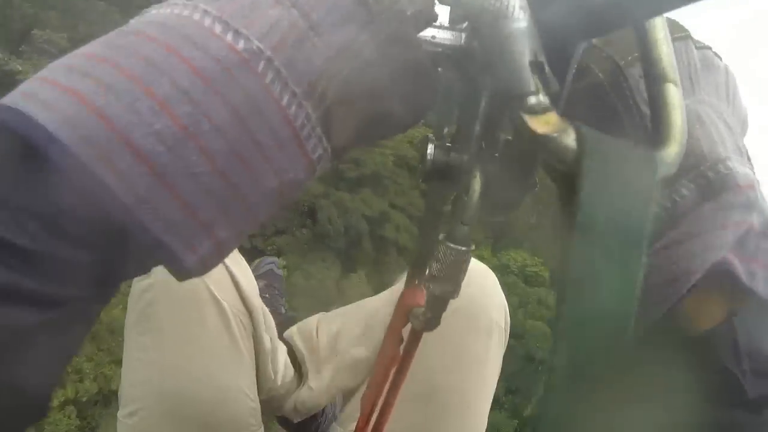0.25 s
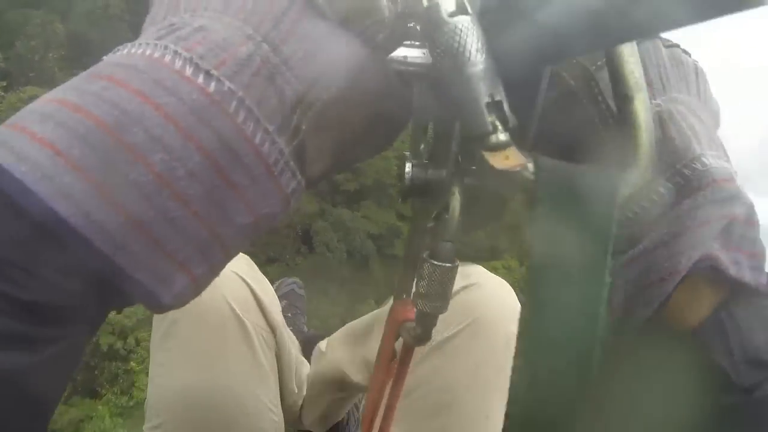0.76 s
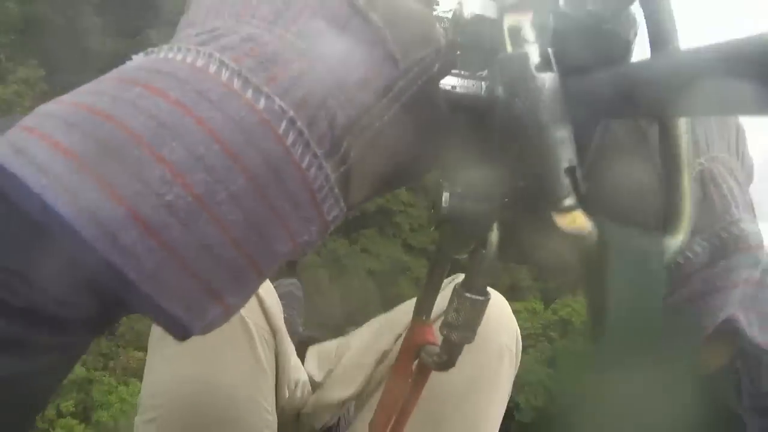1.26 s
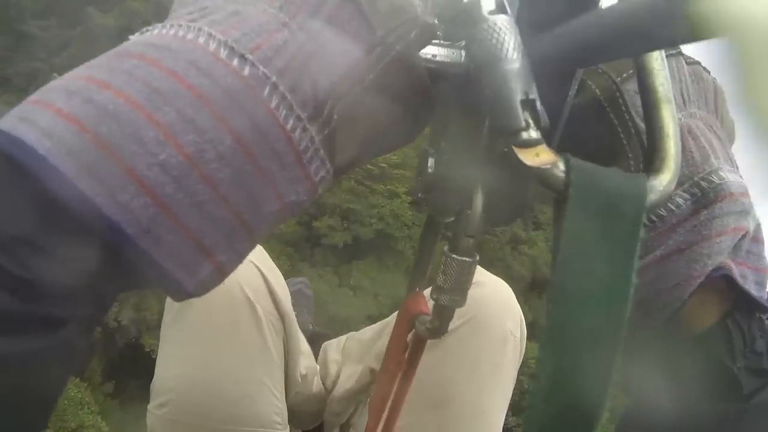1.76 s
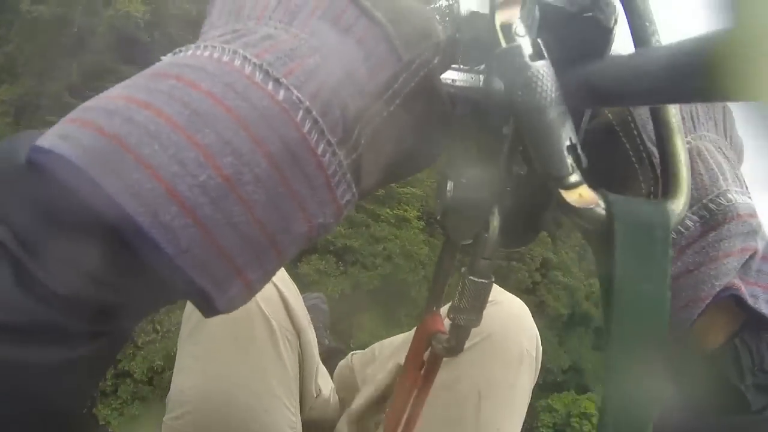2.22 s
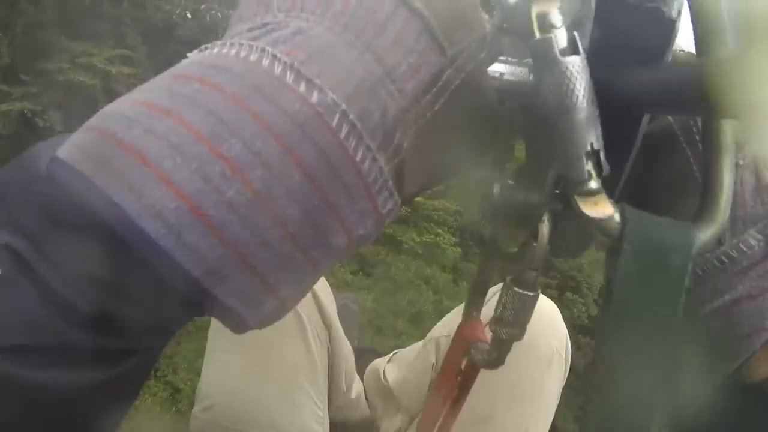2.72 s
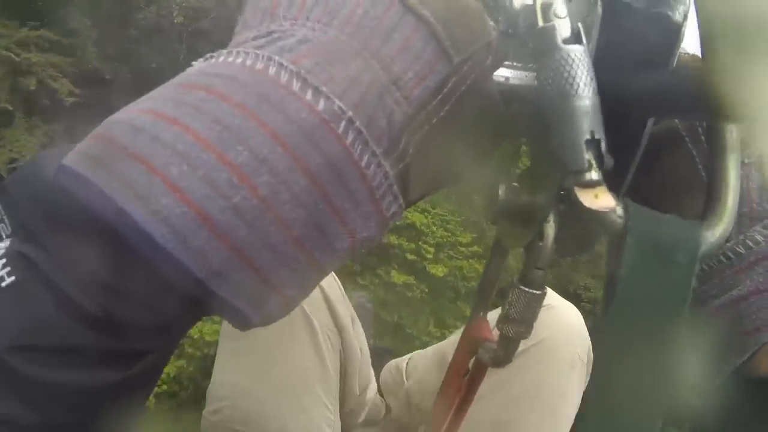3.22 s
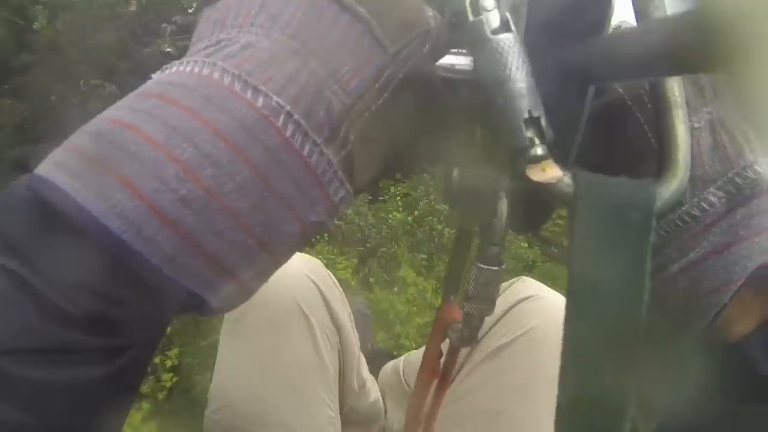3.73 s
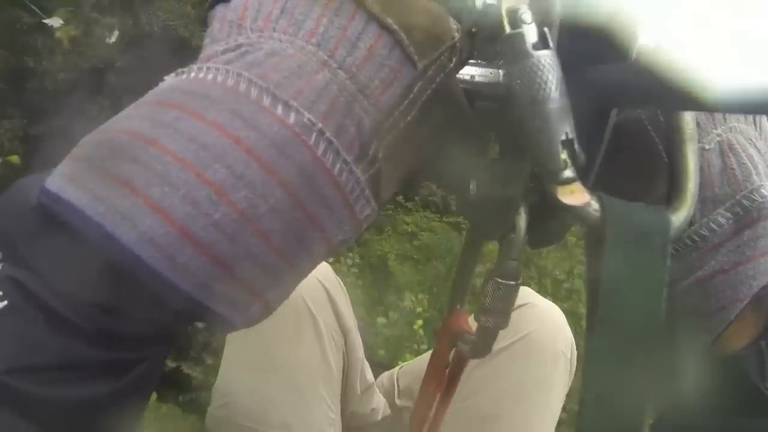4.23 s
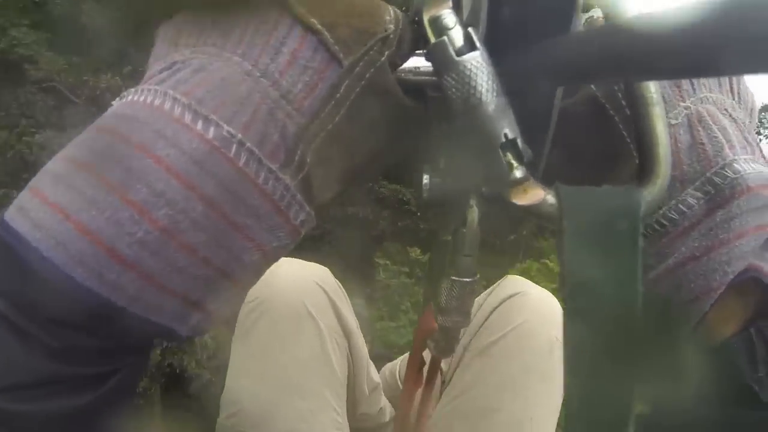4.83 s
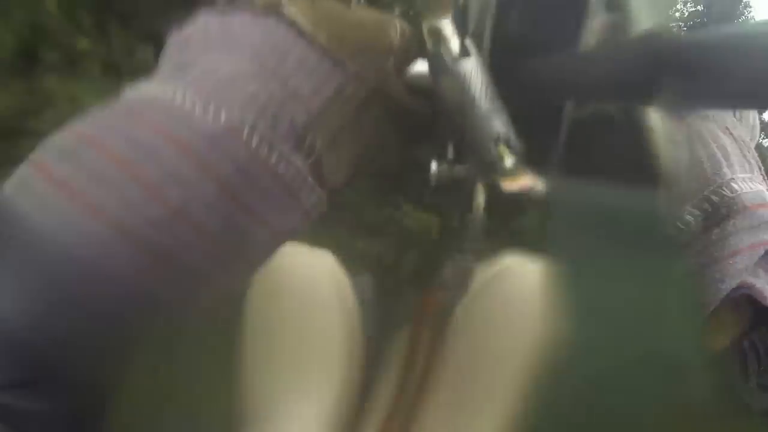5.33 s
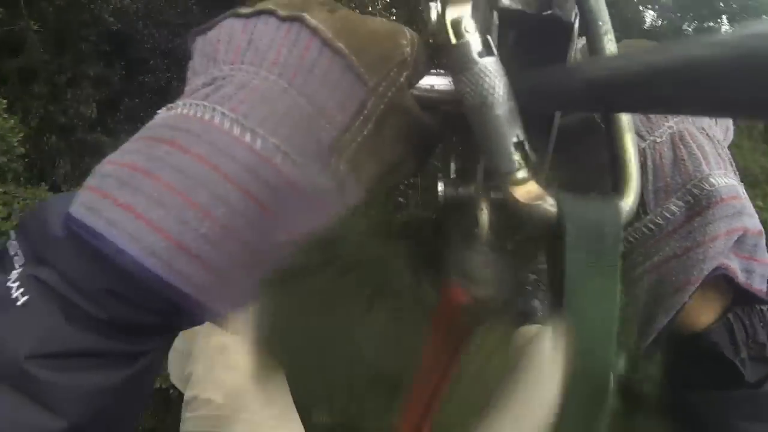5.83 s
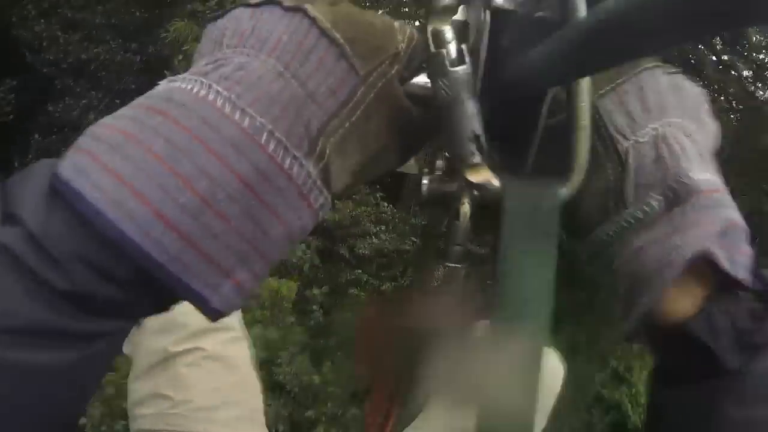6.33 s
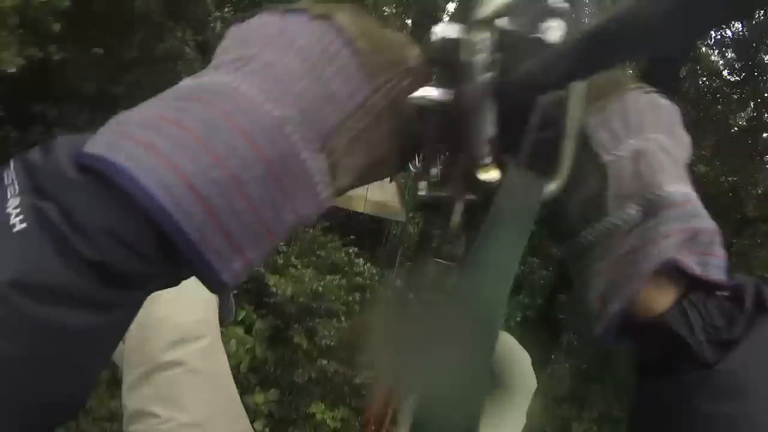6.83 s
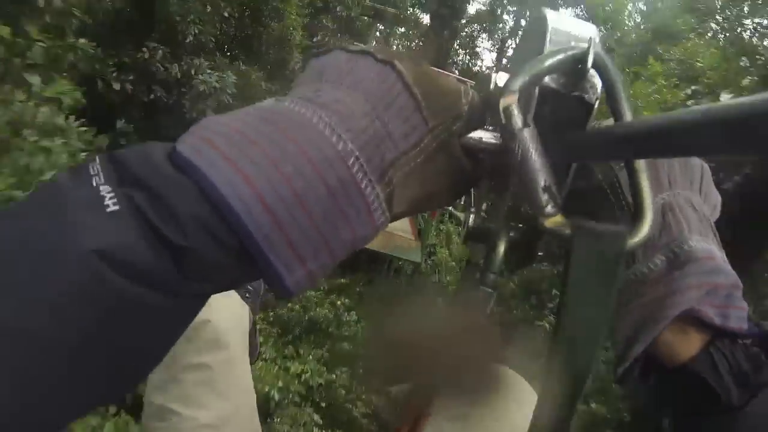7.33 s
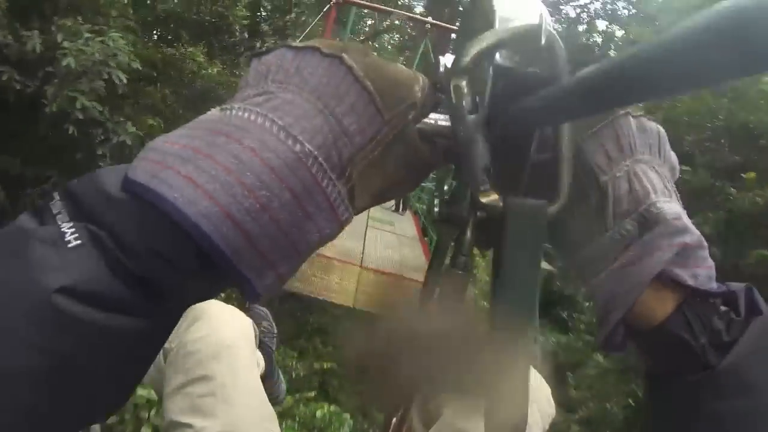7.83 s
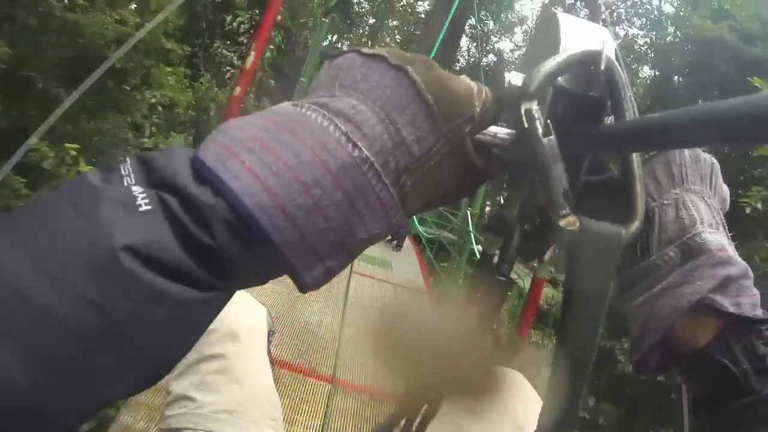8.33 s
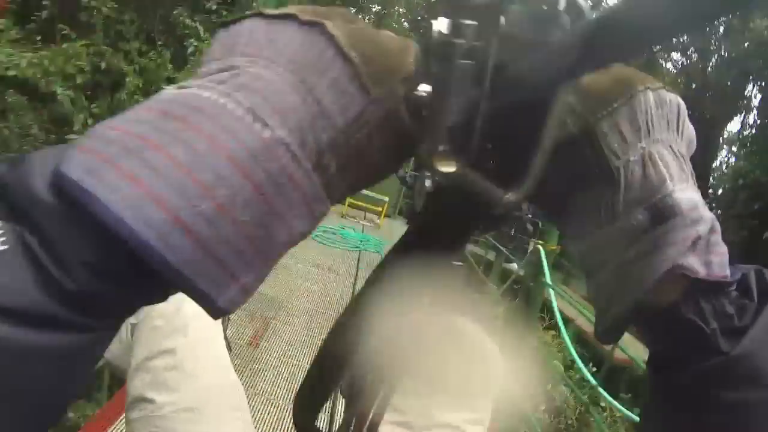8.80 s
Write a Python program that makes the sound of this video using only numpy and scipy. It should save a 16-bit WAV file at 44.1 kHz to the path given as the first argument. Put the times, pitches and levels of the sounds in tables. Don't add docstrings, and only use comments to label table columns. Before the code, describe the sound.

A zip line trolley is already running fast on a steel cable outdoors, heard close through a sealed case worn by the rider. Wheels and bearings give a high, gritty metallic whine that swells and wavers, over muffled wind buffeting and hollow low boom. At about 0.9 s a twig raps the case in a quick hard cluster; the ride dips, then recovers. The whine continues, gradually falling in pitch, with small jolts. At 5.7 s another twig clatters, and from 6.4 to 6.7 s a branch scrapes roughly with loud cracks, leaving the ride much quieter before it creeps back. A sharp tick comes near 6.8 s. From 7 s the slowing wheels tick rapidly, with a strand hum around 7.5 to 8 s and bright surges. A deep thump lands near 8.7 s; the rumble thins, wind buffeting rises, and light taps close at 9 s.

```python
import sys
import numpy as np
from scipy import signal
from scipy.fft import rfft, irfft
from scipy.io import wavfile
from scipy.ndimage import uniform_filter1d

SR = 44100
rng = np.random.default_rng(int(sys.argv[2]) if len(sys.argv) > 2 else 0)


def dump_mix(stems):
    frames = np.atleast_2d(stems).T
    limited = np.clip(frames, -1, 1)
    pcm = np.round(limited * 32767).astype(np.int16)
    wavfile.write(sys.argv[1], SR, pcm)


def natural_amplitude(level_db):
    exponent = np.asarray(level_db, float) / 20
    return 10 ** exponent


N = 399546
T = np.arange(N) / SR

# time in seconds, force in dB, share taken by wheels and bearings in dB.
ROLL = [(0, -26, -2), (.35, -31, 3.5), (.85, -27.5, 3.5), (1.5, -27, 1.5), (2.2, -29.5, 4.5),
        (2.8, -26, 1.5), (3.4, -26, -1), (4.3, -25, 2), (5.2, -27, 2.5), (5.65, -25.5, 0.5),
        (6.22, -27, -0.5), (6.38, -21.5, 0), (7.3, -29, 2), (7.52, -24, 5), (8.0, -26, 4), (8.2, -32, 1.5),
        (8.6, -34.5, 5.5), (9.06, -33, 6)]
# time in seconds, half length in seconds, lift of the frame
# in dB, lift of wheels and bearings in dB.
SWINGS = [(0.188, 0.059, 7.5, 2), (0.595, 0.22, 0.5, 2.5), (2.136, 0.16, 2, 1.5), (2.37, 0.063, 5, 0.5),
          (2.614, 0.034, 2, 3), (2.986, 0.03, 4, 3.5), (3.248, .08, -1, 0.5), (3.5, 0.05, -0.5, -0.5),
          (3.6, 0.027, 2.5, 0), (3.96, 0.15, 4, 0), (4.192, 0.11, 1.5, 1), (4.5, 0.16, 0.5, -1.5),
          (4.767, 0.13, 1, -1.5), (5.92, 0.023, 4.5, 4), (6.95, 0.082, -3, 1.5), (7.507, 0.033, 1.5, 3),
          (7.66, 0.11, 5, 0), (7.925, 0.08, 5, 7.5), (8.284, 0.052, 0.5, 5.5), (8.662, 0.033, -2, 3),
          (8.75, 0.068, 6.5, 3.5), (9.066, 0.084, 11, 3)]
JOLTS = [1.564, 3.133, 3.298, 3.512, 3.919, 4.674, 4.734, 4.835, 4.845, 5.912, 8.475, 8.859]
# pitch in Hz, width in Hz, level in dB.
FRAME = [
    (1430, 160, -36),
    (1659, 222, 8.5),
    (1845, 111, 9),
    (1110, 210, -35.5),
    (527, 590, -22.5),
]
# pitch in Hz, width in Hz, level in dB.
PLATE = [
    (2212, 95, 0.5),
    (2004, 82, 3),
]
# pitch in Hz, width in Hz, level in dB.
WHEEL = [
    (2776, 111, 15.5),
    (2966, 180, 5),
    (2454, 230, 0),
    (3230, 250, -5.5),
    (3640, 95, -2.5),
]
# pitch in Hz, width in Hz, level in dB.
BEARING = [
    (4060, 140, 4),
    (4484, 600, 5),
    (4804, 376, 8),
    (4970, 210, -31),
    (5640, 230, -14),
    (6190, 570, -9.5),
    (7340, 570, -23.5),
    (9000, 650, -29),
    (10600, 900, -48),
]
PLATE_DB, WHEEL_DB, BEARING_DB = -6, -9.5, -14
PLATE_CALMS, BEARING_FOLLOWS = 1.4, 0.44
JOLT_DB, JOLT_S = 7.0, .005
SLACK_DB, SLACK_S = -4, .006


def trolley():
    force = cable()
    level_db, share_db = curves(ROLL)
    swing_db, spin_db = sum(np.outer(db, np.exp(-((T - s) / half) ** 2)) for s, half, *db in SWINGS)
    halfway = np.convolve(JOLTS, [.5, .5], "valid")
    gap = T - np.take(JOLTS, np.searchsorted(halfway, T))
    jolt_db = JOLT_DB * np.exp(-abs(gap) / JOLT_S)
    slack_db = SLACK_DB * np.exp(-abs(gap) / SLACK_S)
    swing_db = swing_db + np.where(gap > 0, jolt_db, slack_db)
    swing_db = uniform_filter1d(uniform_filter1d(swing_db, size=50), size=50)
    plate_db = PLATE_DB + PLATE_CALMS * 20 * np.log10(curves(SPEED)[0] / 750)
    wheel_db = WHEEL_DB + share_db + spin_db
    bearing_db = BEARING_DB + BEARING_FOLLOWS * share_db + 1.1 * spin_db
    parts = zip((plate_db, wheel_db, bearing_db), (PLATE, WHEEL, BEARING), wander(1.9, count=3))
    out = natural_amplitude(swing_db) * shaken(force, FRAME)
    for db, part, flutter_db in parts:
        out = out + natural_amplitude(db + flutter_db) * shaken(force, part)
    return natural_amplitude(level_db) * out


# time in seconds, strands passed per second in Hz.
SPEED = [(0, 887), (.22, 882.4), (.5, 858.1), (1.2, 798), (2.1, 736.3), (2.8, 710.2), (3.5, 678.4),
         (4.2, 647.6), (4.9, 604.8), (5.6, 555.7), (6.3, 513.2), (7, 443), (7.5, 392.2), (7.65, 373.9),
         (7.9, 352.3), (8.2, 324.3), (8.6, 296.3), (9.06, 260.5)]
# start in seconds, end in seconds, level in dB.
HUMS = [
    (-.1, 0.218, -14.5),
    (7.54, 7.704, -13.5),
    (7.696, 8.038, -22.5),
]
LINES_DB, LINES_FOLLOW = -3.5, 0.35
BUMP_DEPTH, BUMP_DEPTH_SLOW = 0.13, 0.2
HUM_FLOOR_DB = -48


def cable():
    speed = curves(SPEED)[0]
    lays = np.cumsum(speed) / (6 * SR)
    octaves = np.log2(speed / 890)
    depth = BUMP_DEPTH + BUMP_DEPTH_SLOW * octaves ** 2 / 4

    uneven = sum(.3 * np.cos(2 * np.pi * k * lays + k * k) for k in (1, 2, 3, 4, 5, 7))
    bumps = np.cos(12 * np.pi * lays) + uneven
    spikes = np.minimum(rng.exponential(1, N), 5)
    grit_db = 2.0 * wander(92, count=1)[0] + 6.7 * depth * spikes
    grit = evened(rng.standard_normal(N) * natural_amplitude(grit_db)) * (1 + np.clip(depth, 0, 1) * bumps)

    wavering = lays + 0.005 * wander(6, count=1)[0]
    fades = wander(2.5, count=36)
    lines = sum(natural_amplitude(4.7 * fade) * np.cos(2 * np.pi * (k + .3) * wavering + k * k)
                for k, fade in enumerate(fades, 14))
    lines_db = LINES_DB + LINES_FOLLOW * curves(ROLL)[1] - 6.5

    humming = natural_amplitude(HUM_FLOOR_DB)
    for start, end, db in HUMS:
        humming = humming + natural_amplitude(db) * np.clip(np.minimum(T - start, end - T) / 0.036 + .5, 0, 1)
    hum = np.cos(24 * np.pi * lays) + np.cos(36 * np.pi * lays)
    return evened(grit) + natural_amplitude(lines_db) * evened(lines) + humming * hum


def ticks():
    per_s = np.interp(T, [0, 6.8, 7.4], [1, 3, 35])
    chance, size = rng.random((2, N))
    kinks = (chance < per_s / SR) * natural_amplitude(14 * size)
    burst = rng.standard_normal(256) * np.exp(-np.arange(256) / 60)
    bright = [(hz, width, 0.32 * db) for hz, width, db in BEARING]
    tick_db = curves(ROLL)[0] + BEARING_DB - 23
    return natural_amplitude(tick_db) * shaken(signal.oaconvolve(kinks, burst)[:N], bright)


# frequency in Hz, density in dB per Hz.
CRACK = [(300, -45), (1500, 10), (2500, 17), (3500, -25.5), (5000, -32), (6000, -30), (8000, -47),
         (10000, -41), (13000, -81)]


def knocks():
    out, t = np.zeros(N + 8192), np.arange(8192) / SR
    rows = contacts()
    draws = rng.standard_normal((len(rows), 2, 8192))
    nexts = [row[0] for row in rows[1:]] + [N / SR]
    for (s, length, db, hz, thud_db, ring_db), (rub, hiss), after in zip(rows, draws, nexts):
        touch = t < length
        push = muffled(rub * touch + 7.6 * (t == 0), 2000, order=2)
        size = np.sqrt((length + .002) / t[-1])
        shell_modes = [(hz, 400, 0), (1480, 250, -9), (2250, 350, -7), (2560, 240, -11)]
        shell = size * evened(through(push, shell_modes))
        loudness = abs(uniform_filter1d(shell ** 2, size=60))
        shell = size * evened(shell / np.sqrt(.4 + .6 * loudness))

        slips = muffled(touch * (np.exp(-t / 0.00087) + 0.072 * rub ** 2), 480, order=2)
        crack = evened(coloured(hiss, CRACK)) * slips
        thud_modes = [(0.24 * hz, 300, -5), (250, 200, 0), (130, 90, -3), (45, 40, -7)]
        thud = size * evened(through(push, thud_modes))

        ring = np.sin(2 * np.pi * 1812 * t) * natural_amplitude(-60 * t / .5) * np.minimum(t / length, 1)
        stopped = np.clip((after - s - t) / .002 + 1, 0, 1)
        ring = ring * stopped * np.clip((t[-1] - t) / 0.065, 0, 1)

        start = round(s * SR)
        blow = shell + 0.49 * crack + natural_amplitude(thud_db) * thud + natural_amplitude(ring_db) * ring
        out[start:start + len(t)] += natural_amplitude(db) * blow
    return out[:N]


# start in seconds, length in seconds, level in dB,
# ring in dB.
KNOCKS = [
    [(.911, .007, -20, -30), (.9185, .004, -3, -30), (.925, .003, -20, -25), (.934, .006, -16, -18),
     (.944, .005, -18, -14), (.958, .005, -16, -20), (.9725, .005, -15, -17)],
    [(5.7245, .002, -7, -31), (5.737, .004, -12, -25), (5.757, .007, -18, -17), (5.777, .007, -19, -20),
     (5.785, .003, -16, -21)],
    [(6.4145, .004, -4, -30), (6.42, .01, -16, -13), (6.436, .036, -15, -21), (6.485, .003, -18, -8),
     (6.492, .011, -14, -13), (6.51, .018, -14, -17), (6.534, .007, -17, -9), (6.548, .006, -12, -20),
     (6.569, .006, -13, -8), (6.598, .026, -14, -22), (6.627, .01, -15, -14), (6.655, .008, -15, -17)],
]
# shell pitch in Hz, pitch drift in Hz per second, thud in dB,
# thud drift in dB per second.
BRANCHES = [
    (1717, -400, -21, 23.5),
    (1946, 300, -5.5, -57),
    (1650, -500, -13.5, -16),
]
# start in seconds, length in seconds, level in dB,
# shell pitch in Hz, thud in dB.
TAPS = [
    (5.923, 0.0023, -38.5, 2000, -33),
    (6.787, 0.00063, -19, 1650, -42),
    (8.742, .012, -64, 430, 26),
    (8.994, .01, -37, 1700, -15),
    (9.032, 0.0096, -23.5, 1890, -15),
    (9.049, 0.0014, -33, 1716, -19),
    (9.053, 0.0036, -21.5, 1800, -14),
]
HARD_THUD = 0.37


def contacts():
    rows = [(*tap, -30) for tap in TAPS]
    for hits, (hz, hz_per_s, thud_db, db_per_s) in zip(KNOCKS, BRANCHES):
        for s, length, db, ring_db in hits:
            since = s - hits[0][0]
            hit_thud_db = thud_db + db_per_s * since + HARD_THUD * (db + 10)
            rows.append((s, length, db, hz + hz_per_s * since, hit_thud_db, ring_db))
    return sorted(rows)


# time in seconds, gust in dB.
GUSTS = [(0, -32), (.35, -36.5), (.9, -32), (1.4, -37.5), (2.3, -35), (3.0, -41.5), (3.9, -36),
         (4.2, -34.5), (4.5, -42), (5.0, -37.5), (5.6, -43), (6.3, -33), (6.9, -34), (7.4, -30.5),
         (7.7, -28.5), (8.5, -29), (8.8, -28), (9.06, -23)]
# frequency in Hz, density in dB per Hz.
BUFFET = [(4.7, -32), (8.0, -1.5), (21, 0.5), (36, -2.5), (56, -3.5), (76, -32.5), (130, -36), (200, -30.5),
          (260, -74.5), (440, -120)]
# frequency in Hz, density in dB per Hz.
ROAR = [(40, -40), (65, 8), (100, 0), (150, -0.5), (200, -17.5), (400, -41.5)]
# frequency in Hz, density in dB per Hz.
BOOM = [(100, -3.5), (170, -8), (260, 0), (310, -5.5), (380, -21), (700, -19), (1100, -27.5), (1400, -58)]
# start in seconds, end in seconds, change in dB.
LULL = (8.79, 12, -16)
ROAR_DB, ROAR_GUST, ROAR_FADE_DB_PER_S = -14, 0.41, 0.04
BOOM_DB, BOOM_GUST, BOOM_FADE_DB_PER_S = -7.5, 0.49, -1
BUFFET_LIFT = 0.12


def wind():
    start, end, lull_db = LULL
    gust_db = curves(GUSTS)[0]
    roll_db = curves(ROLL)[0] + lull_db * np.clip(np.minimum(T - start, end - T) / .03, 0, 1)
    buffet_db = gust_db - BUFFET_LIFT * ducking_db()
    roar_db = ROAR_DB + roll_db + ROAR_GUST * (gust_db - roll_db + 8) + ROAR_FADE_DB_PER_S * T
    boom_db = BOOM_DB + roll_db + BOOM_GUST * (gust_db - roll_db + 7.5) + BOOM_FADE_DB_PER_S * T
    layers = ((buffet_db, BUFFET, 2.0), (roar_db, ROAR, 2.2), (boom_db, BOOM, 2.1))
    out = np.zeros(N)
    for (db, colour, lumpy_db), lump in zip(layers, wander(18, count=3)):
        air = rng.standard_normal(N) * natural_amplitude(lumpy_db * lump)
        out += natural_amplitude(db) * evened(coloured(air, colour))
    return out


# first knock in seconds, last knock in seconds, quick dip in dB, lasting dip in dB.
DUCKS = [
    (0.923, 1.025, -15, -5.5),
    (5.726, 5.803, -7.5, -16),
    (6.409, 6.662, -18.5, -16),
]
HOLD_S, QUICK_S, RECOVER_DB_PER_S = 0.024, 0.051, 5.5


def ducking_db():
    gain_db = np.zeros(N)
    for first, last, quick_db, lasting_db in DUCKS:
        since = np.maximum(T - last - HOLD_S, 0)
        dip_db = quick_db * np.exp(-since / QUICK_S) + np.minimum(lasting_db + RECOVER_DB_PER_S * since, 0)
        gain_db = np.where(T > first, np.minimum(gain_db, dip_db), gain_db)
    return uniform_filter1d(gain_db, size=200)


def shaken(x, modes):
    hz = np.fft.rfftfreq(len(x), 1 / SR)
    power = sum(natural_amplitude(2 * db) / (1 + ((hz - f) / width) ** 2) ** 3 for f, width, db in modes)
    return evened(irfft(rfft(x) * np.sqrt(power), len(x)))


def through(x, modes):
    out = 0
    for hz, width, db in modes:
        peak = signal.iirpeak(hz, hz / (1.14 * width), SR)
        out = out + natural_amplitude(db) * signal.lfilter(*peak, signal.lfilter(*peak, x))
    return out


def muffled(x, hz, order):
    return signal.sosfilt(signal.butter(order, hz, fs=SR, output="sos"), x)


def coloured(x, points):
    hz = np.fft.rfftfreq(x.shape[-1], 1 / SR)
    f, db = np.transpose(points)
    return irfft(rfft(x) * natural_amplitude(np.interp(np.log(hz + 1), np.log(f + 1), db)), x.shape[-1])


def wander(hz, count):
    step = 64
    size = N // step + 2
    z = rfft(rng.standard_normal((count, size)))
    slow = irfft(z / (1 + (np.fft.rfftfreq(size, step / SR) / hz) ** 2), size)
    return [np.interp(np.arange(N) / step, np.arange(len(v)), evened(v)) for v in slow]


def curves(table):
    s, *columns = np.transpose(table)
    return [np.interp(T, s, c) for c in columns]


def evened(x):
    return x / np.sqrt(np.mean(x ** 2) + 1e-20)


def scene():
    return (natural_amplitude(ducking_db()) * (trolley() + ticks() + wind()) + knocks())[None]


def roll_off(x):
    return signal.sosfilt(signal.butter(12, 14080, fs=SR, output="sos"), x)


def record(dry):
    mix = np.clip(muffled(dry, 9880, order=8), -1, 1)
    return roll_off(mix)


dry = scene()
out = record(dry)
dump_mix(out)
```